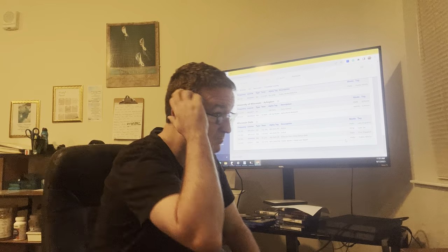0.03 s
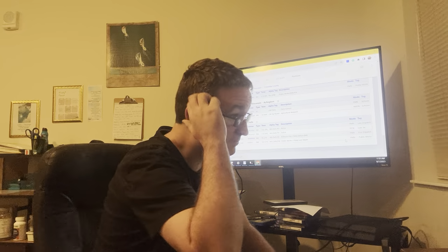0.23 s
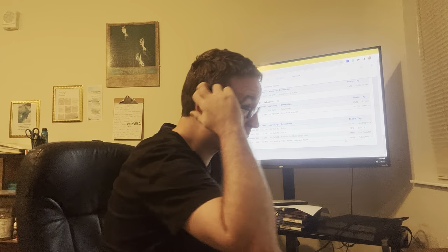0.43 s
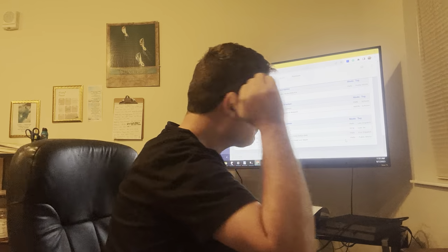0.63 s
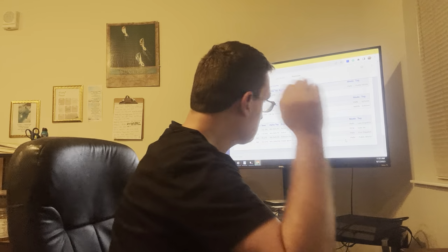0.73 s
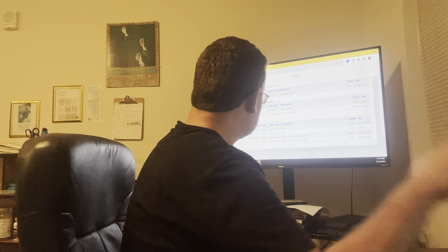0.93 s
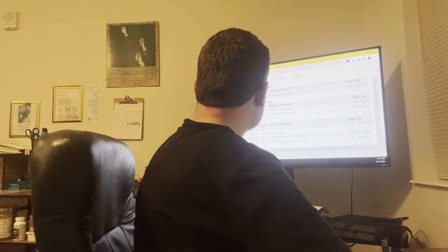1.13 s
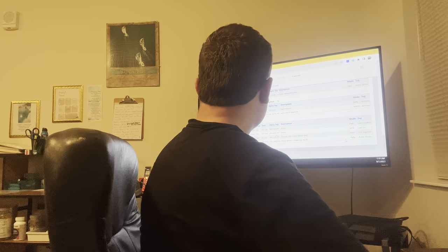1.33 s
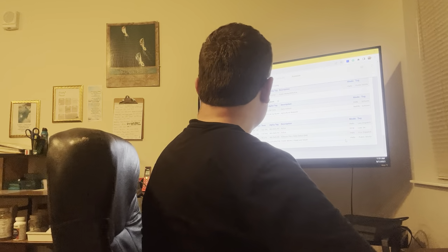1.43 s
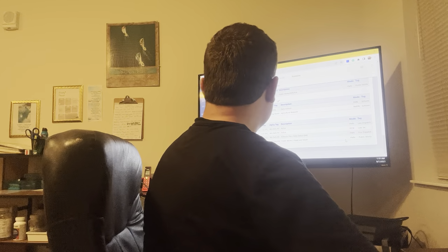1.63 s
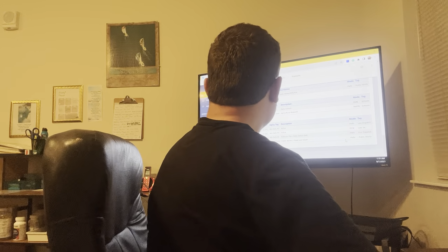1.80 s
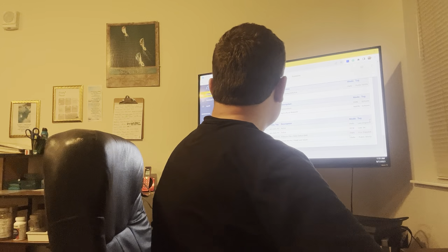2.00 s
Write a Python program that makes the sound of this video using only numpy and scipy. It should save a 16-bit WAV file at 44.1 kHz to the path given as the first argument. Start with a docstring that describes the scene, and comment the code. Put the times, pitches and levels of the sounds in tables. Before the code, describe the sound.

A leather office chair shifts and swivels: a quick cluster of knocks, low juddering and leather rubbing, then a firmer thump and faint settling creaks, close up in a small room with soft fan air and hum.

```python
"""A leather office chair swivels and takes shifting weight, in a small quiet room with fan air and mains hum.
Base, leather, shirt and faint late creaks are friction: random slips, filtered and shaped in level.
The loose frame knocks as damped modes with a noise crack; upholstery ticks are short noise bursts.
The hide's squeaks are wavering, falling tones. Two microphones a hand apart pick it all up.
"""
import sys
import numpy as np
from scipy import signal
from scipy.fft import rfft, irfft, next_fast_len
from scipy.io import wavfile
from scipy.ndimage import map_coordinates

SR = 44100
rng = np.random.default_rng(int(sys.argv[2]) if len(sys.argv) > 2 else 0)


def to_wav(sig):
    """Store sig (one row per channel, or 1-D mono) as 16-bit WAV at the path in sys.argv[1].

    Samples outside -1..1 are clipped; the rate is SR.
    """
    pcm = np.clip(np.atleast_2d(sig), -1, 1) * 32767
    pcm = np.round(pcm).astype(np.int16)
    wavfile.write(sys.argv[1], SR, pcm.T)  # frames by channels


N = 90890


def amp(db):
    """Decibels to gain."""
    return 10 ** (np.asarray(db) / 20)


def unit(x):
    """Scale to rms 1."""
    return x / np.sqrt(np.mean(x ** 2) + 1e-20)


def along(points, hz):
    """Interpolate (Hz, value) points on a log frequency axis."""
    f, v = np.transpose(points)
    return np.interp(np.log(hz + 1), np.log(f), v)


def level(points):
    """Gain per sample from (s, dB) points."""
    return amp(np.interp(np.arange(N) / SR, *np.transpose(points)))


def wobble(rate_hz):
    """Smooth random curve through rate_hz Gaussian knots a second."""
    knots = rng.standard_normal(1024)
    return map_coordinates(knots, [np.arange(N) * rate_hz / SR], mode='wrap')


def filtered(x, response):
    """Apply a complex frequency response, zero-padded."""
    n = x.shape[-1]
    m = 2 * next_fast_len(n // 2 + SR // 4)
    spectrum = rfft(x, m) * response(np.fft.rfftfreq(m, 1 / SR))
    return irfft(spectrum, m)[..., :n]


def coloured(x, colour):
    """Filter to a (Hz, dB) colour at minimum phase, by folding the cepstrum onto positive time."""
    def response(hz):
        cepstrum = irfft(np.log(amp(along(colour, hz))))
        half = len(cepstrum) // 2
        cepstrum[1:half] *= 2
        cepstrum[half + 1:] = 0
        return np.exp(rfft(cepstrum))
    return filtered(x, response)


def diffuse(size):
    """Stereo noise whose channel correlation depends on frequency, set by the mid/side balance."""
    # channel correlation: f/Hz, correlation
    likeness = [(60, 0.96), (150, -0.14), (250, 0.76), (400, 0.87), (650, 0.013), (1000, 0.79),
                (1500, 0.17), (3000, -0.16), (12000, 0.4)]

    def mid_side(hz):
        angle = np.arccos(np.clip(along(likeness, hz), -1, 1)) / 2
        return np.array([np.cos(angle), np.sin(angle)])
    mid, side = filtered(rng.standard_normal((2, size)), mid_side)
    return np.array([mid + side, mid - side])


def slips(colour, rate, scatter_db, clump_rate, clump_db):
    """Friction of rms 1: tiny random slips (rate per s) of uneven size that come in clumps."""
    signs = np.sign(rng.standard_normal(N))
    sizes = signs * amp(scatter_db * rng.uniform(-0.41, 1, N))
    occurs = rng.random(N) < rate / SR
    pulses = occurs * sizes * amp(clump_db * wobble(clump_rate))
    return unit(coloured(pulses, colour))


def room(x, wet_db):
    """Direct sound reaching the left microphone first, resonant standing waves and a diffuse tail."""
    left_lead_s = 0.0004765
    # standing waves: f/Hz, width/Hz, level/dB
    standing_modes = [(86.3, 8.2, 4.5), (131, 19, -2.5), (183.7, 2.5, -0.5), (245, 9.8, 1), (294, 9, 5.5),
                      (463.4, 31, 2)]
    # tail decay: f/Hz, t60/s
    decay_t60 = [(100, 0.44), (500, 0.44), (2000, 0.32), (6000, 0.5), (14000, 0.15)]

    def lead(f):
        return np.exp(1j * np.pi * f * left_lead_s * np.array([[1], [-1]]))

    def resonances(f):
        return sum(amp(db) * 1j * f * width / (centre * centre - f * f + 1j * f * width)
                   for centre, width, db in standing_modes)

    hz, t, bins = signal.stft(diffuse(SR // 2), SR, nperseg=256)
    decay = amp(-60 * t / along(decay_t60, hz)[:, None])
    build_up = 1 - np.exp(-t / 0.0037)
    tail = signal.istft(bins * decay * build_up, SR, nperseg=256)[1]
    wet = signal.fftconvolve(x[None], tail / np.linalg.norm(tail[0]), axes=1)[:, :N]
    mix = filtered(x, lead) + filtered(x, resonances) + amp(wet_db) * wet
    return mix / np.sqrt(1 + amp(wet_db) ** 2)


def room_tone():
    """Fan air as diffuse noise; mains hum as slightly unsteady sines, equal in both channels."""
    air_db = -56.5
    # hum: f/Hz, level/dB rms
    hum_partials = [(59.5, -59.5), (119.5, -58), (161.5, -71.5), (241.5, -61.5), (357, -70), (538, -84.5)]
    # air colour: f/Hz, level/dB
    air_colour = [(20, -5.5), (45, -0.5), (85, -1), (160, 1.5), (280, -2), (400, 2), (520, -13), (720, -24),
                  (1000, -22.5), (1350, -22), (2200, -36), (3200, -37.5), (6000, -35.5), (9000, -47.5),
                  (12000, -43), (13200, -60.5)]
    t = np.arange(N) / SR
    hum = np.zeros(N)
    for hz, db in hum_partials:
        gain = np.sqrt(2) * amp(db + 0.61 * wobble(3.9))
        hum += gain * np.sin(2 * np.pi * (hz * t + rng.random()))
    air = unit(coloured(diffuse(N), air_colour))
    return hum + amp(air_db + 1.1 * wobble(7.8)) * air


def base():
    """The swivel judders in clumped slips as it turns; the floor rumbles under the moving weight."""
    swivel_db, deep_db = -1.5, -2
    # turning base: t/s, level/dB
    turning = [(0, -68), (.1, -53.5), (.22, -50), (.44, -40), (.52, -39), (.6, -31.5), (.71, -41.5),
               (.81, -34), (.96, -37.5), (1.02, -41.5), (1.1, -47), (1.28, -58.5), (1.42, -69), (1.6, -60),
               (1.7, -91), (1.8, -64), (1.89, -52.5), (2.05, -68)]
    # swivel colour: f/Hz, level/dB
    swivel_colour = [(25, -52.5), (45, -45), (70, -4.5), (100, -1), (135, 5), (185, 0.5), (260, -11.5),
                     (500, -52), (1000, -68.5)]
    # weight bearing on the floor: t/s, level/dB
    bearing = [(0, -53), (.1, -55), (.19, -44), (.28, -53.5), (.42, -63.5), (.9, -63.5), (1.02, -38.5),
               (1.13, -57.5), (1.24, -47.5), (1.33, -47.5), (1.45, -69)]
    # deep rumble colour: f/Hz, level/dB
    deep_colour = [(25, -21), (38, -20), (52, 5), (80, 5), (115, -12), (200, -42), (500, -79.5)]
    swivel = slips(swivel_colour, rate=900, scatter_db=4.0, clump_rate=25, clump_db=-1.0)
    deep = slips(deep_colour, rate=590, scatter_db=-3.5, clump_rate=14, clump_db=-2.2)
    return amp(swivel_db) * level(turning) * swivel + amp(deep_db) * level(bearing) * deep


def leather():
    """Dull slips over the padding, plus denser, brighter crinkle slips of the hide."""
    rub_db, crinkle_db = -0.5, -2.5
    # body sliding on leather: t/s, level/dB
    sliding = [(0, -56), (.1, -52), (.2, -49), (.29, -48.5), (.41, -39), (.46, -42), (.54, -35.5),
               (.63, -46.5), (.7, -44), (.79, -41), (.89, -46), (1.02, -53), (1.12, -54), (1.16, -44),
               (1.25, -49.5), (1.36, -54), (1.5, -65)]
    # rub colour: f/Hz, level/dB
    rub_colour = [(60, -35.5), (150, -2), (240, 1.5), (330, -0.5), (460, -0.5), (600, -4.5), (730, -10),
                  (850, -34), (1500, -59.5), (4000, -65)]
    # crinkling hide: t/s, level/dB
    crinkling = [(0, -55.5), (.08, -56.5), (.19, -55), (.28, -53.5), (.34, -57.5), (.4, -47), (.45, -52),
                 (.55, -49.5), (.65, -49), (.71, -55.5), (.81, -51.5), (1.02, -56), (1.12, -66),
                 (1.15, -55), (1.23, -59), (1.3, -67), (1.38, -74), (1.5, -73), (1.6, -72), (1.8, -78)]
    # crinkle colour: f/Hz, level/dB
    crinkle_colour = [(300, -10), (720, -4), (850, -3.5), (1000, 5), (1250, -6), (1500, 2), (1800, 2),
                      (2050, -2), (2400, -14.5), (3100, -17), (5000, -25.5), (12000, -73)]
    rub = slips(rub_colour, rate=420, scatter_db=4, clump_rate=40, clump_db=1.15)
    crinkle = slips(crinkle_colour, rate=1700, scatter_db=6, clump_rate=140, clump_db=1.3)
    return amp(rub_db) * level(sliding) * rub + amp(crinkle_db) * level(crinkling) * crinkle


def shirt():
    """Cloth swishes over the backrest in dense, bright fibre slips."""
    cloth_db = -1.5
    # shirt brushing the backrest: t/s, level/dB
    brushing = [(0, -67), (.06, -69.5), (.15, -72.5), (.22, -70), (.35, -77.5), (.41, -66.5), (.48, -74),
                (.57, -69), (.65, -58.5), (.73, -66.5), (.785, -58.5), (.98, -66.5), (1.12, -75),
                (1.16, -65), (1.25, -70.5), (1.33, -81), (1.5, -100), (1.8, -105)]
    # cloth colour: f/Hz, level/dB
    cloth_colour = [(1000, -29.5), (2600, 4.5), (3300, -5), (4300, -1), (6200, -3.5), (8500, -17.5),
                    (11700, -15.5), (12800, -39), (16000, -37)]
    fibres = slips(cloth_colour, rate=3000, scatter_db=8, clump_rate=110, clump_db=2)
    return amp(cloth_db) * level(brushing) * fibres


def ticks(decay_s):
    """Upholstery snaps: exponentially decaying bright noise bursts."""
    # ticks: t/s, level/dB
    snaps = [(.0075, -54), (0.019, -57.5), (0.108, -56), (0.117, -50.5), (0.1196, -50.5), (0.382, -63.5),
             (0.526, -66), (0.781, -51.5), (.979, -61), (1.396, -72)]
    # tick colour: f/Hz, gain/dB
    tick_colour = [(1000, -36.5), (3500, 1.5), (5800, 8.5), (8500, -4), (12000, -1), (15500, -9.5)]
    out = np.zeros(N + SR)
    t = np.arange(SR // 50) / SR
    for start_s, db in snaps:
        burst = np.exp(-t / decay_s) * rng.standard_normal(len(t))
        out[int(start_s * SR):][:len(t)] += amp(db) * burst
    return coloured(out[:N], tick_colour)


def frame():
    """Each contact cracks briefly and rings the loose frame, most of all the modes near its own band."""
    contact_q, mode_scatter_db = 3.43, 1.2
    crack_db, crack_decay_s, ring_rise_s = -13, 0.0058, 0.0011
    # contacts: t/s, level/dB, band centre f/Hz
    knocks = [(0.0534, -25.5, 590), (.065, -27, 636), (0.0719, -26.5, 500), (0.085, -28.5, 350),
              (0.111, -38.5, 430), (.134, -35.5, 450), (0.249, -32.5, 600), (.305, -28.5, 173),
              (.425, -37, 650), (0.506, -35, 544), (0.63, -37, 300), (0.72, -34, 550), (0.88, -32, 326),
              (1.029, -39.5, 400), (1.137, -31, 514), (1.1405, -22, 378), (1.158, -25.5, 329),
              (1.185, -30.5, 270), (1.255, -39.5, 241), (1.294, -36, 250)]
    # frame modes: f/Hz, level/dB, t60/s
    modes = [(138, -2, 0.11), (236.2, -8, 0.28), (284.7, -2.5, 0.056), (363, 3.5, 0.034),
             (469, -1.5, 0.033), (564, -4.5, 0.026), (630, 3, 0.028), (698, -7, .03), (993, -4.5, 0.13),
             (1400, -16.5, 0.019), (1800, -15, 0.02), (2006, -7, 0.039)]
    # upholstery damping of the ring: f/Hz, gain/dB
    padding = [(30, -11), (90, 0), (600, 2), (710, -2.5), (820, -17), (1000, -14.5), (1400, 0.5)]
    # crack colour: f/Hz, gain/dB
    crack_colour = [(700, -17), (860, 2), (1020, 10.5), (1270, -13.5), (1700, 1), (2100, -3.5),
                    (3000, -10.5), (6000, -22), (11000, -34), (14000, -39.5)]
    rings, cracks = np.zeros((2, N + SR))
    t = np.arange(SR // 4) / SR
    for start_s, db, centre_hz in knocks:
        ring = np.zeros(len(t))
        for hz, mode_db, t60_s in modes:
            reach = 1 / np.hypot(1, contact_q * (hz / centre_hz - centre_hz / hz))
            decay = amp(mode_db + rng.normal(0, mode_scatter_db) - 60 * t / t60_s)
            ring += reach * decay * np.sin(2 * np.pi * hz * t)
        crack = np.exp(-t / crack_decay_s) * rng.standard_normal(len(t))
        start = int(start_s * SR)
        rings[start:][:len(t)] += amp(db) * ring * (1 - np.exp(-t / ring_rise_s))
        cracks[start:][:len(t)] += amp(db + crack_db) * crack
    return coloured(rings[:N], padding) + coloured(cracks[:N], crack_colour)


def squeaks():
    """Fast, uneven stick-slip, as a wavering tone whose pitch sags as the hide relaxes."""
    edge_s, waver_hz, waver_rate_hz = 0.01, 35.5, 320
    # squeaks: t/s, length/s, starting f/Hz, final f/Hz, level/dB rms before the fades
    slides = [(0.077, 0.017, 1020, 995, -64), (.252, 0.051, 1090, 981, -59.5),
              (0.368, .05, 1150, 1065, -63), (0.436, 0.089, 1170, 961, -63),
              (1.554, 0.049, 1056, 1051, -59.5)]
    t = np.arange(N) / SR
    out = np.zeros(N)
    for start_s, length_s, from_hz, to_hz, db in slides:
        end_s = start_s + length_s
        pitch_hz = np.interp(t, [start_s, end_s], [from_hz, to_hz]) + waver_hz * wobble(waver_rate_hz)
        fades = np.clip(np.minimum(t - start_s, end_s - t) / edge_s, 0, 1)
        tone = amp(1.8 * wobble(110)) * np.sin(2 * np.pi * np.cumsum(pitch_hz) / SR)
        out += amp(db) * fades * unit(tone)
    return out


def creak():
    """The seat settles with a few short, faint runs of slips."""
    rise_s, fall_db_per_s = 0.004, 480
    # settling: t/s, length/s, level/dB
    runs = [(1.555, 0.039, -52), (1.691, 0.051, -62.5), (1.811, 0.085, -66)]
    # creak colour: f/Hz, level/dB
    creak_colour = [(80, -17.5), (130, -12), (220, -1), (450, 9.5), (720, -5), (880, -10), (1020, 3.5),
                    (1200, -6), (1520, -5.5), (1750, -38), (2050, -22.5), (2800, -34.5), (6000, -31.5),
                    (10000, -54), (14000, -65)]
    t = np.arange(N) / SR
    envelope = np.zeros(N)
    for start_s, length_s, db in runs:
        rise = np.clip((t - start_s) / rise_s, 0, 1)
        envelope += rise * amp(db - fall_db_per_s * np.maximum(t - start_s - length_s, 0))
    return envelope * slips(creak_colour, rate=900, scatter_db=3, clump_rate=120, clump_db=1)


def scene():
    """Chair and sitter, each source with its own share of room sound, over the room tone."""
    out = room_tone()
    out = out + room(base(), wet_db=-5.5)
    out = out + room(leather(), wet_db=-3.0)
    out = out + room(shirt(), wet_db=-2.5)
    out = out + room(ticks(decay_s=0.0023), wet_db=1.5)
    out = out + room(frame(), wet_db=-2.5)
    out = out + room(squeaks(), wet_db=-2)
    return out + room(creak(), wet_db=-3.0)


def record(dry):
    """Each microphone's colour and a sharp band limit, with mirrored ends against edge effects."""
    top_hz = 15800
    # left microphone: f/Hz, gain/dB
    left_colour = [(100, 0), (1500, 1.1), (6400, -1), (7400, -6.5), (8400, 9.5), (9400, 4.5), (10500, -0.5)]
    # right microphone: f/Hz, gain/dB
    right_colour = [(100, 0), (1500, 1.6), (6300, -1.5), (7300, -8.5), (8400, 1), (9400, 1), (10500, -0.5)]

    def response(hz):
        gains_db = np.array([along(left_colour, hz), along(right_colour, hz)])
        return amp(gains_db) * (hz < top_hz)
    edge = SR // 20
    padded = np.pad(dry, ((0, 0), (edge, edge)), mode='reflect')
    return filtered(padded, response)[:, edge:edge + N]


dry = scene()
out = record(dry)
to_wav(out)
```